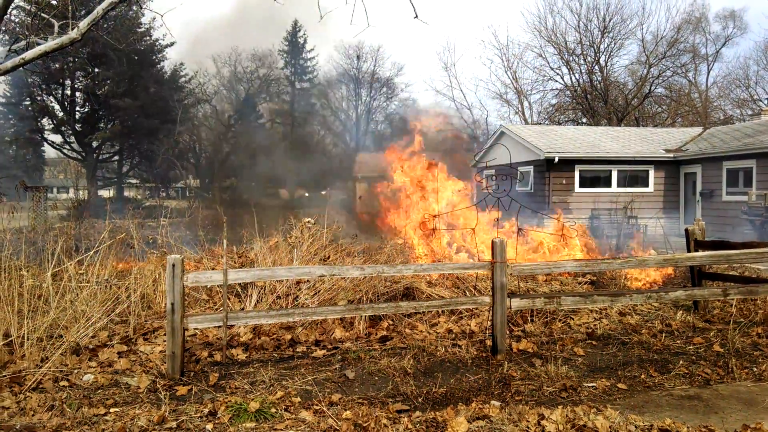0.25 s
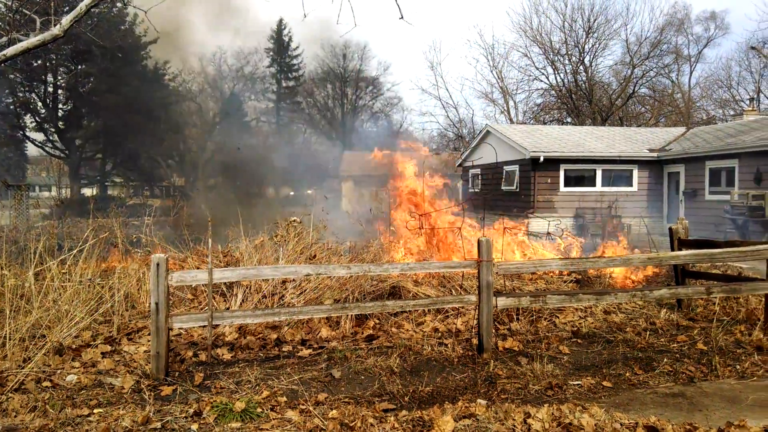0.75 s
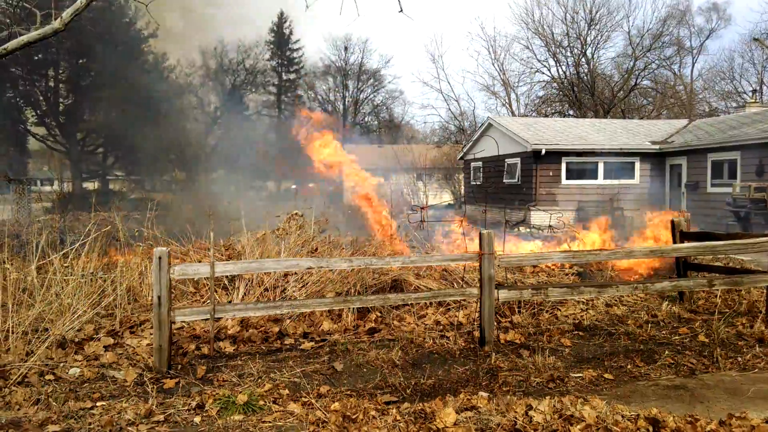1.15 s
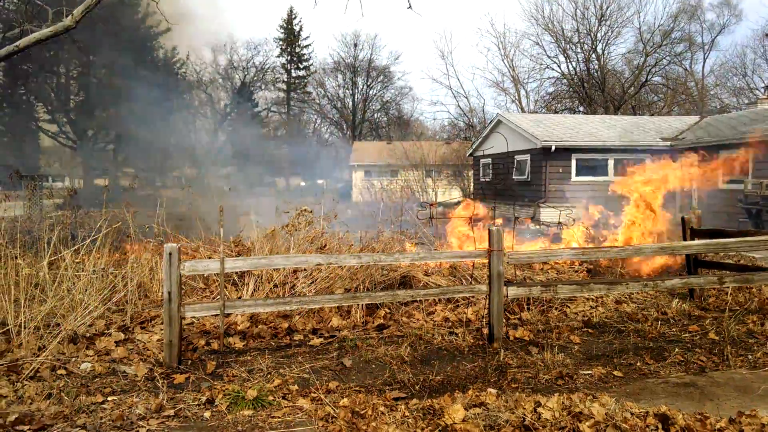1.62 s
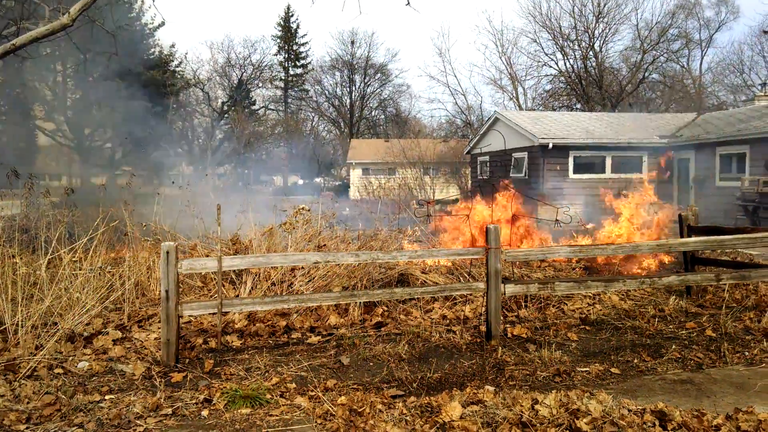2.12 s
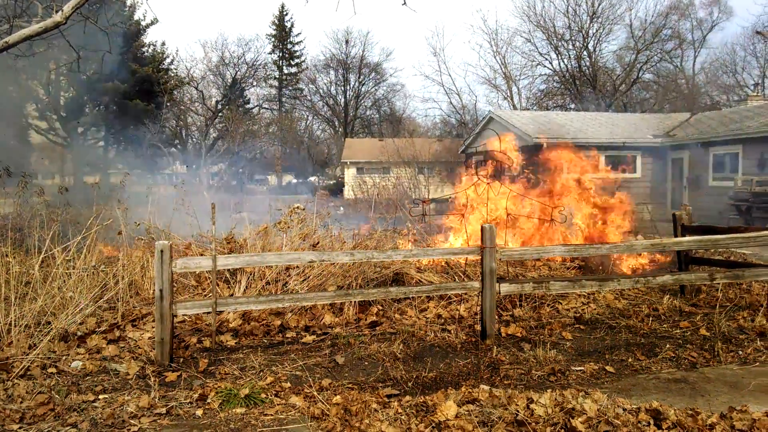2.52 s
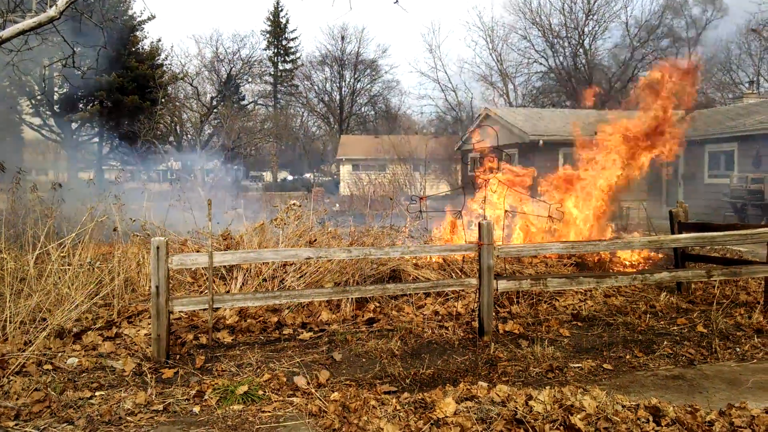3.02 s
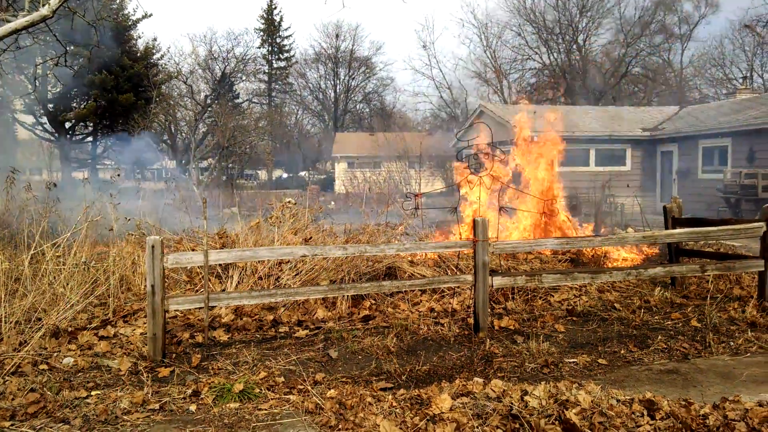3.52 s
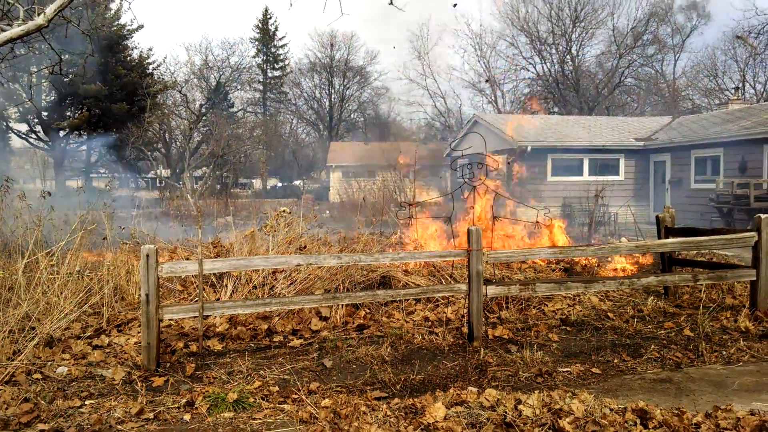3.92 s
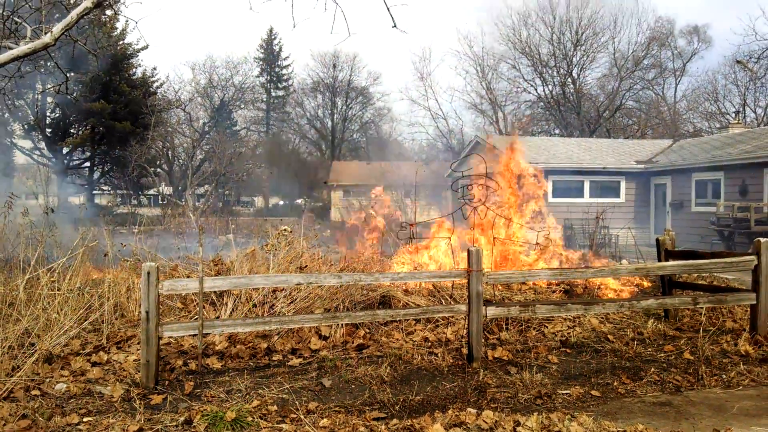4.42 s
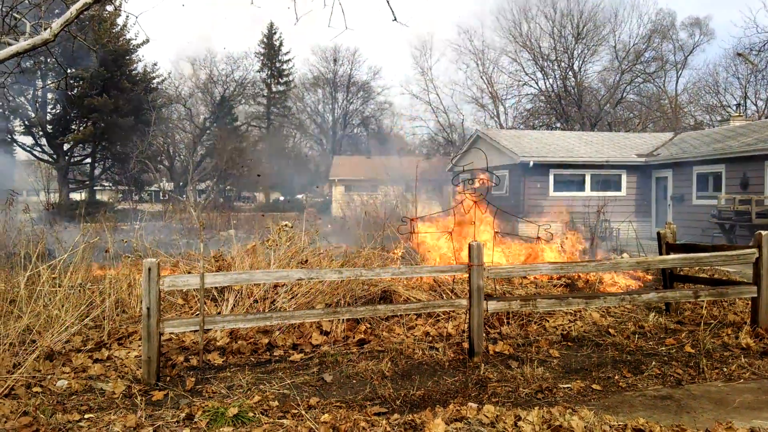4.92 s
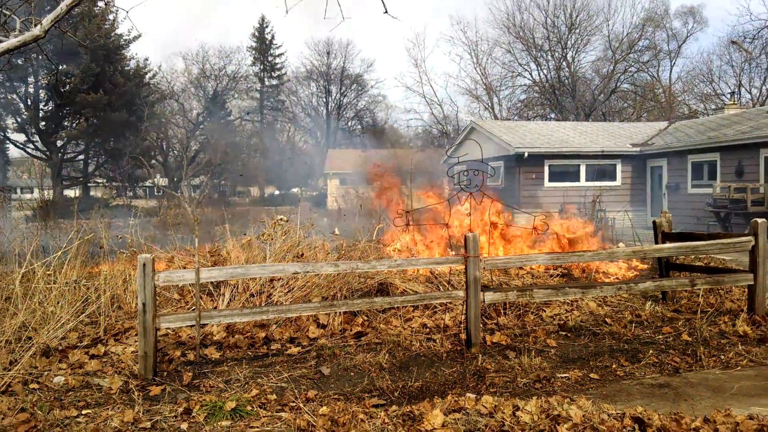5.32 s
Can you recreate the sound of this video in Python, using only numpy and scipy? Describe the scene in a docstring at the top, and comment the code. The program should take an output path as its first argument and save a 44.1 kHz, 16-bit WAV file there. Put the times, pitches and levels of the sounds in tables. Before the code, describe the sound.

A crackling grass fire snaps and hisses in an open yard, with heavy low wind buffeting over the stereo microphone.

```python
"""Dry grass and leaves burn in a yard, some metres from a stereo microphone.
Stalks burst in sharp pops, made of a hard crack, a ragged tear and a ringing hollow.
Countless small snaps crackle, steam sizzles as filtered noise, and the flames make a soft rush.
Gusts of wind buffet the two microphone ports: a low rumble of noise and rounded thumps."""
import sys
import numpy as np
from scipy import signal
from scipy.fft import rfft, irfft, next_fast_len
from scipy.io import wavfile
from scipy.ndimage import uniform_filter1d

SR = 44100
rng = np.random.default_rng(int(sys.argv[2]) if len(sys.argv) > 2 else 0)


def materialize(psi):
    """Save the field psi as 16-bit PCM at rate SR to the path in sys.argv[1].

    A 1-D psi becomes a single channel; in a 2-D psi each row is a channel.
    """
    bounded = np.clip(np.atleast_2d(psi).T, -1, 1)
    quanta = np.round(bounded * 32767).astype(np.int16)
    wavfile.write(sys.argv[1], SR, quanta)


N = 244903

# individually placed pops of bursting stalks, loud and faint, with a close rebound at 1.401 s;
# before common trims and stereo placing: start_s, level_db (2.6-7 kHz, averaged over 10 ms),
# body_db (against that level), hollow_pitch_hz, top_db (against that level),
# break_ms (nominal length of the break)
PLACED_POPS = [(0.038, -59, 10, 1300, 10, 0.85), (0.0688, -48, 8.5, 1410, -3.5, 1),
               (0.1064, -51, -2, 1200, 7, 1.1), (0.1246, -50, -3, 1500, 5, 0.9),
               (0.146, -48, 5.5, 1040, -2, 1.5), (0.25, -37.5, -7, 1630, -19, 0.82),
               (0.3303, -55, 12.5, 1010, -5, 1.3), (0.3495, -44.5, 6, 1100, 0, 0.9),
               (0.373, -46, 1, 1160, -14, 0.56), (0.4046, -35.5, -9, 1110, 3, 4.8),
               (0.4137, -29.5, 0, 770, 3, 0.45), (0.4778, -43, 3, 1110, -3, 1),
               (0.4941, -38.5, 0.5, 700, 3.5, 1.1), (0.581, -44.5, -2, 1400, -7, 0.98),
               (0.6051, -34.5, 4.5, 790, 3, 2.7), (0.7227, -35, -6.5, 1190, -2.5, 1.1),
               (0.7892, -55, -2, 1300, 12.5, 1.2), (0.814, -43.5, 0.5, 1100, 6, 0.81),
               (0.8628, -44.5, 0.5, 1300, 2.5, 0.53), (0.916, -38, -5, 650, -5, 1.2),
               (0.9951, -42, -11, 1500, -2, 1), (1.027, -38.5, -2.5, 1040, 7, 0.9),
               (1.128, -43, 1, 1000, 6, 1.1), (1.2263, -30, 0.5, 1310, 7.5, 1.3),
               (1.2886, -37.5, -3, 1200, -4, 1.5), (1.3291, -43, 2.5, 900, -11, 0.8),
               (1.3656, -28.5, -2, 945, -7, 0.92), (1.3689, -37, 1, 1100, 5, 1.1),
               (1.398, -23, -1.5, 910, 0, 0.36), (1.401, -27, -16, 900, -13, 0.33),
               (1.4193, -45, -4, 1200, 4, 1.6), (1.4451, -35, -7.5, 1640, -11, 2.1),
               (1.515, -49.5, 10, 1290, -2, 0.71), (1.5324, -38, -2, 790, 0, 1.7),
               (1.575, -33.5, 1.5, 1700, 2.5, 16), (1.6032, -31.5, 0.5, 1370, -4, 1.7),
               (1.678, -30.5, -5, 2070, 8, 1.6), (1.7209, -40, -7, 1200, 0, 1.2),
               (1.7287, -37.5, -4, 1400, 1, 1.1), (1.7683, -22.5, -4.5, 760, 5, 2.3),
               (2.0313, -40.5, -6, 1100, -2, 1), (2.041, -39, -2, 1210, -1, 1.6),
               (2.0725, -35.5, -9, 1300, 0, 1.1), (2.093, -25, -4, 890, -22, 1.1),
               (2.262, -19.5, -10, 794, -1.5, 2.5), (2.3282, -19, -15.5, 1530, -2.5, 0.65),
               (2.394, -51.5, 15.5, 1010, -1, 1.1), (2.5513, -36, -0.5, 1040, 0.5, 11.3),
               (2.6122, -51, -5, 1300, 4, 1.1), (2.6484, -38.5, -5, 1250, 1.5, 1.8),
               (2.669, -39.5, -21, 1400, -3, 1.7), (2.7486, -55, -8, 1200, 14.5, 1.2),
               (2.779, -46.5, -7, 1400, 7, 1.5), (2.818, -23, -4.5, 890, 1, 1.5),
               (2.842, -43, 8, 770, 5, 1.6), (2.945, -19.5, -2, 2170, -3.5, 1.13),
               (3.013, -42, 0.5, 960, 4, 5), (3.115, -49, -1, 750, 9.5, 4.4), (3.2, -43, 11, 870, 3, 1.5),
               (3.209, -41, 2, 1250, 3, 3.9), (3.2351, -35, -4.5, 1270, 1.5, 3.5),
               (3.3, -36, -2.5, 2010, 5.5, 0.8), (3.3755, -59, 9, 1100, 4, 0.91),
               (3.3898, -34, -8, 960, -1.5, 1.5), (3.4007, -49, -8, 1300, -1, 1.1),
               (3.4307, -29, 0, 1080, -4.5, 1.2), (3.4446, -39, -2, 1100, -5, 1.3),
               (3.472, -36.5, 0, 1030, 0.5, 4.6), (3.5545, -37, -3.5, 1020, 2.5, 5.3),
               (3.6103, -35.5, -1, 1200, 6.5, 5.4), (3.6428, -36, -4, 1310, 0, 6.7),
               (3.6733, -42, -1, 1300, 4, 0.49), (3.693, -33, -2, 1000, 0.5, 3.9),
               (3.7794, -36, 1, 1160, 2.5, 2.5), (3.8415, -34.5, -2, 675, -1.5, 3.6),
               (3.8575, -45, -9, 1300, 7, 0.98), (3.9544, -36, -1, 750, 2, 6),
               (3.9694, -30.5, -11, 750, -4.5, 3.5), (4.0796, -31, -3.5, 1330, 1, 1.5),
               (4.1435, -41.5, -9, 1400, 3.5, 2.1), (4.1526, -55, 5, 1200, -3, 0.92),
               (4.1773, -38, 1.5, 905, 3, 2.7), (4.243, -47, -4, 1400, 9, 0.7),
               (4.2708, -37.5, 0, 1210, -4, 1.2), (4.285, -42, -15, 1400, -3, 0.91),
               (4.319, -52, -7, 1300, 10, 1), (4.3365, -36, 5, 706, 0.5, 2.7),
               (4.351, -35, 1, 710, -0.5, 2.3), (4.4573, -42, 1.5, 640, -1, 1.7),
               (4.493, -41.5, 4, 1190, -15, 1.2), (4.593, -29.5, -0.5, 1160, 7.5, 0.68),
               (4.6395, -57, 9, 1400, 9, 1.1), (4.68, -38.5, -4, 960, 4, 1.4),
               (4.7063, -32, -12.5, 1640, 0.5, 1.9), (4.7718, -43.5, -2.5, 1150, 4.5, 2.4),
               (4.8418, -45, 11.5, 1170, -3, 0.38), (4.8538, -54, -5, 1200, 0, 1.1),
               (4.8832, -37, 3.5, 1210, -4, 1.7), (4.979, -39, 3, 746, -2, 3.2),
               (5.03, -45.5, 1.5, 1120, -8, 1), (5.07, -44, -20, 1520, 4, 1),
               (5.092, -35, -3.5, 1450, 2.5, 3.3), (5.1728, -27, -5, 1580, 6, 1.14),
               (5.1896, -27.5, -6.5, 1210, 1.5, 3), (5.2112, -29.5, -1.5, 1040, -13, 0.7),
               (5.2268, -41.5, -8, 1400, 6, 1), (5.2605, -40.5, -5.5, 1400, -1, 2.9),
               (5.3007, -46.5, -2, 1200, -3, 0.86), (5.354, -37, -15, 850, -5, 1.4),
               (5.3807, -46.5, -5, 1400, 6, 0.79), (5.392, -49, -3, 1400, 5, 0.7),
               (5.5292, -43, -6.5, 1000, 1, 0.83), (5.5364, -39, 7.5, 1310, 1, 2.4)]
# slow course of the burning, before trims and wavering: time_s, sizzle_db, flame_rush_db
BURN_COURSE = [(0, -55, -54.5), (0.25, -53.5, -51), (0.4, -51.5, -48), (0.75, -51, -47.5), (1.3, -43, -43),
               (1.52, -50, -44.5), (1.66, -43.5, -44.5), (1.86, -41, -47), (2.01, -45, -47),
               (2.3, -36.5, -44.5), (2.47, -47.5, -52), (2.75, -48.5, -48), (3.1, -54.5, -55),
               (3.35, -54.5, -55), (3.63, -45.5, -47.5), (4.35, -49, -48.5), (4.56, -52.5, -51),
               (5.5, -56.5, -54.5)]
# colour of the burning grass: pitch_hz, level_db
FIRE_COLOUR = [(250, -4.5), (600, 2), (1300, 2), (2100, 2), (2700, -1), (3200, -3.5), (4000, -2),
               (5100, -5), (6400, -2.5), (8000, -6.5), (10500, -2.5), (12200, -12), (13500, -14),
               (14800, -14), (16200, -21)]
# tone filter for the sizzle, rush and echo: dip near 2.6 kHz, lift at 3-9 kHz,
# falling above 11 kHz: pitch_hz, level_db
SIZZLE_AND_ECHO_COLOUR = [(2000, 0), (2600, -8.5), (3200, 2.5), (9000, 3), (11500, -3.5), (13400, -2),
                          (15000, -8)]

PORT_LAG_S = .00037  # delay between the two microphone ports


def undb(db):
    """Turn decibels into gain."""
    return 10 ** (np.asarray(db) / 20)


def unit(x):
    """Scale a sound to an rms (average strength) of 1."""
    return x / np.sqrt(np.mean(x ** 2) + 1e-18)


def curves(table):
    """Draw the columns of a time table as curves, one value a sample."""
    time_s, *columns = np.transpose(table)
    return [np.interp(np.arange(N) / SR, time_s, column) for column in columns]


def over_pitch(table, size):
    """Draw the columns of a frequency table as curves, one value a frequency bin."""
    hz, *columns = np.transpose(table)
    bins = np.log(np.fft.rfftfreq(size, 1 / SR) + 1)
    return [np.interp(bins, np.log(hz), column) for column in columns]


def colour(x, table):
    """Filter a sound to the given tone colour, with nothing sounding ahead of its cause."""
    length = x.shape[-1]
    size = 2 * next_fast_len((length + min(length, 8192)) // 2, True)
    # folding the cepstrum forward in time makes the filter minimum-phase
    cepstrum = irfft(np.log(undb(over_pitch(table, size)[0])))
    cepstrum[1:size // 2] *= 2
    cepstrum[size // 2 + 1:] = 0
    response = np.exp(rfft(cepstrum))
    return irfft(rfft(x, size) * response)[..., :length]


BAND_FILTERS = [signal.butter(3, edges_hz, "band", fs=SR, output="sos")
                for edges_hz in [(450, 2600), (2600, 7000), (7000, 12500), (12000, 17000)]]


def split(x):
    """Split a sound into body, middle, top and air, from low to high."""
    return [signal.sosfilt(band, x) for band in BAND_FILTERS]


def walk(rate):
    """Random levels held for 1 / rate seconds and smoothed twice, with rms 1."""
    hold = max(int(SR / rate), 2)
    steps = np.repeat(rng.standard_normal(N // hold + 1), hold)
    return unit(uniform_filter1d(uniform_filter1d(steps, hold), hold)[:N])


def bell(s, half_s):
    """A smooth swell that peaks at 1 at time s."""
    return np.exp(-((np.arange(N) / SR - s) / half_s) ** 2)


def ports(pair, pan_db):
    """Mix two unrelated versions into left and right: most alike near 2 kHz, left later above 1350 Hz."""
    # the two ports, unevenly alike above 3 kHz:
    # pitch_hz, likeness (0-1), left_minus_right_db (before pan_db is added)
    port_match = [(200, 0.71, -2), (950, 0.79, 2.5), (2220, 1, 6), (2800, 0.97, 1.5), (2980, 0.22, 4.5),
                  (3600, 0.78, 2), (5000, 0.95, 5), (6600, 0.06, 3.5), (9600, 0.13, -1.5),
                  (11100, 0.73, -1.5), (14500, 0.5, 6)]
    lag_from_hz = 1350
    size = next_fast_len(pair.shape[-1], True)
    likeness, balance_db = over_pitch(port_match, size)
    shares = np.sqrt([(1 + likeness) / 2, (1 - likeness) / 2])
    shared, apart = rfft(pair, size) * shares
    lagging_hz = np.maximum(np.fft.rfftfreq(size, 1 / SR) - lag_from_hz, 0)
    lag = np.exp(-2j * np.pi * PORT_LAG_S * lagging_hz)
    lean = undb((balance_db + pan_db) / 2)
    left = (shared + apart) * lag * lean
    right = (shared - apart) / lean
    return irfft(np.array([left, right]), size)[:, :pair.shape[-1]]


def sizzle_level(follow=0.49, typical_pop_db=-33, waver_db=1):
    """Sizzle in dB: steady burning plus a puff of steam after every placed pop, growing with its strength."""
    vent_db, rise_s, fall_s = -8.5, 0.0018, 0.03  # vent_db is against a typical pop
    kicks = np.zeros(N)
    for s, db, *_ in PLACED_POPS:
        puff_db = vent_db + typical_pop_db + follow * (db - typical_pop_db)
        kicks[min(int(s * SR), N - 1)] += undb(puff_db) ** 2
    t = np.arange(SR // 2) / SR
    puff = (1 - np.exp(-t / rise_s)) * np.exp(-t / fall_s)
    vent_power = signal.fftconvolve(kicks, (puff / puff.max()) ** 2)[:N]
    steady_db = curves(BURN_COURSE)[0] + waver_db * walk(24.74)
    return 10 * np.log10(undb(steady_db) ** 2 + vent_power)


def crackle(rate, spread_db, count=10):
    """Dense tiny snaps, most faint and a few strong; twigs ring low, blades higher, fine fibres highest."""
    ring_s, snap_q = .0006, 2.5
    out = 0
    for hz in np.geomspace(800, 13000, count):
        snaps = rng.random(N) < rate / SR  # rate is snaps a second in each register
        strength = np.minimum(rng.standard_exponential(N)[snaps], 3)
        energy = np.zeros(N)
        energy[snaps] = undb(spread_db * strength) ** 2
        fading = signal.lfilter([1], [1, -np.exp(-2 / (ring_s * SR))], energy + 1e-18)
        noise = np.sqrt(fading) * rng.standard_normal((2, N))
        out = out + signal.lfilter(*signal.iirpeak(hz, snap_q, fs=SR), noise)
    return unit(out)


def burning(sizzle_db, snap_db=-4, steam_db=-3, twig_db=-5, rush_db=-1, fibre_db=-4, flicker_db=2.5,
            brighten=0.15, top_db=1, flutter_db=0.3, roar_db=-43.5):
    """Snaps of twigs, blades and fibres over steam hiss and flame rush; a strong blaze is brighter."""
    # low roar of the flames: pitch_hz, level_db
    roar_colour = [(20, 1), (60, 1.5), (180, 3.5), (330, -5.5), (600, -8.5), (1000, -15), (2000, -24)]
    _, flame_db = curves(BURN_COURSE)
    snaps = colour(crackle(rate=130, spread_db=2.0), FIRE_COLOUR)
    flicker = undb(flicker_db * walk(160))
    gas = colour(rng.standard_normal((2, N)) * flicker, FIRE_COLOUR)
    # each register has its own mix of snaps and gas
    body = split(undb(twig_db) * snaps + undb(rush_db) * gas)[0]
    middle = split(undb(snap_db) * snaps + undb(steam_db) * gas)[1]
    top = sum(split(undb(fibre_db) * snaps + undb(steam_db) * gas)[2:])
    blaze_db = sizzle_db - np.mean(sizzle_db)
    top_gain = undb(top_db + brighten * blaze_db + flutter_db * walk(85))
    sizzle = (unit(middle) + top_gain * unit(top)) * undb(sizzle_db - 3.0)
    rush = unit(body) * undb(flame_db - 2.5)
    roar_level_db = roar_db + 1.17 * (flame_db - np.mean(flame_db)) + 0.7 * walk(11.0)
    roar = unit(colour(rng.standard_normal((2, N)), roar_colour)) * undb(roar_level_db)
    return ports(colour(sizzle + rush, SIZZLE_AND_ECHO_COLOUR) + roar, pan_db=-4.5)


def ticks(sizzle_db, count=250, size=256, tick_db=-50.5, follow=0.67):
    """Single blades snap near by: each tick is a burst of noise fading in under a millisecond, at its own pitch."""
    blaze_db = follow * (sizzle_db - np.mean(sizzle_db))
    t = np.arange(size) / SR
    out = np.zeros((2, N + size))
    for when, pitch, length, strength in rng.random((count, 4)):
        start = int(when * N)
        hz = 2400 * 6 ** pitch
        ring_s = .00006 + .0003 * length
        extra_db = -4.5 * np.log(.04 + strength)  # a few ticks stand out
        noise = np.exp(-t / ring_s) * rng.standard_normal((2, size))
        tick = signal.lfilter(*signal.iirpeak(hz, 1.8, fs=SR), noise)
        out[:, start:start + size] += unit(tick) * undb(tick_db + blaze_db[start] + extra_db)
    return ports(colour(out[:, :N], FIRE_COLOUR), pan_db=-6.5)


def turbulence(table, steady_s):
    """Low noise whose slow swells are evened out, so that the gusts alone set its strength."""
    x = colour(rng.standard_normal(N), table)
    return x / np.sqrt(uniform_filter1d(x ** 2, int(steady_s * SR)) + 1e-18)


def wind(swell_db=1.5, eddy_db=-1, own_swell_db=-13, own_eddy_db=-11, lean_db=.5):
    """Gusts push the ports in opposite senses, the right later and weaker; each has some turbulence of its own."""
    # breeze at the microphone, before flutter and trims: time_s, pressure_db
    breeze_course = [(0, -33), (0.28, -32), (0.6, -23), (1.0, -33), (1.28, -35.5), (1.7, -32.5),
                     (2.03, -49), (2.2, -42), (2.6, -36.5), (3.0, -29.5), (3.35, -33.5), (3.85, -25.5),
                     (4.02, -28), (4.3, -19.5), (4.42, -23), (4.63, -31.5), (4.9, -26), (5.15, -33.5),
                     (5.55, -30.5)]
    # gusts on top of the breeze, before trims:
    # peak_s, pressure_db, half_length_s, small_eddies_db (against the pressure)
    gust_list = [(0.122, -28.5, 0.036, -8), (0.366, -23.5, 0.019, -6.5), (0.506, -19.5, 0.054, -7),
                 (0.838, -18, 0.024, -7), (0.95, -20, 0.044, -7), (1.085, -15, 0.041, -15),
                 (1.39, -24, 0.021, -28), (1.547, -31, 0.067, -16), (1.67, -29, 0.01, -26),
                 (2.916, -17.5, 0.013, -7), (3.444, -19, 0.035, -4), (3.75, -21, 0.014, -14),
                 (3.874, -19.5, 0.12, -14), (4.212, -20.5, 0.04, -19), (4.392, -16.5, 0.039, -13),
                 (4.48, -27, 0.059, -25), (4.875, -17.5, 0.037, -9.5), (4.983, -16.5, 0.042, -9),
                 (5.291, -23.5, 0.016, -12)]
    # large eddies on the ports: pitch_hz, level_db
    swell_colour = [(8, -39), (22, -9.5), (45, 2.5), (110, -2), (170, -7), (260, -20.5), (500, -50.5),
                    (1000, -81)]
    # small eddies on the ports: pitch_hz, level_db
    eddy_colour = [(60, -12), (130, -10.5), (220, 4.5), (320, -5), (480, -18), (700, -21), (1200, -50.5),
                   (3000, -61)]
    breeze_eddy_db, breeze_flutter_db = -12, 3  # small eddies against the pressure; unsteadiness
    breeze = undb(curves(breeze_course)[0] + breeze_flutter_db * walk(15))
    flows = [(breeze, breeze_eddy_db)]
    for s, db, half_s, small_db in gust_list:
        flows.append((undb(db) * bell(s, half_s), small_db))
    # separate flows add up as powers
    swell = undb(swell_db) * np.sqrt(sum(flow ** 2 for flow, _ in flows))
    eddy = undb(eddy_db) * np.sqrt(sum((flow * undb(small_db)) ** 2 for flow, small_db in flows))
    push = swell * turbulence(swell_colour, 0.05) + eddy * turbulence(eddy_colour, 0.0317) + buffets()
    own = []
    for _ in range(2):
        own_swell = swell * undb(own_swell_db) * turbulence(swell_colour, 0.038)
        own_eddy = eddy * undb(own_eddy_db) * turbulence(eddy_colour, 0.06)
        own.append(own_swell + own_eddy)
    left = push * undb(lean_db)
    right = -np.roll(push, round(PORT_LAG_S * SR)) / undb(lean_db)
    return np.array([left, right]) + np.array(own)


def small_pops(count=36, over_sizzle_db=-5.5, spread_db=1.5, follow=1.0, body_db=-2, body_spread_db=3,
               stalk_hz=1150, top_db=2, top_spread_db=7.5, break_ms=1.0):
    """Thin stalks burst at random moments, louder where the fire is strong; rows as in PLACED_POPS."""
    sizzle_db, _ = curves(BURN_COURSE)
    mean_db = np.mean(sizzle_db)
    base_db = mean_db + follow * (sizzle_db - mean_db) + over_sizzle_db
    # one random moment in each equal slice of time
    starts = ((np.arange(count) + rng.random(count)) / count * (N - 1)).astype(int)
    chances = np.clip(rng.standard_normal((count, 5)), -2, 2)
    return [(i / SR, base_db[i] + spread_db * a, body_db + body_spread_db * b,
             stalk_hz * 2 ** (c / 2), top_db + top_spread_db * d, break_ms * 2 ** (e / 2))
            for i, (a, b, c, d, e) in zip(starts, chances)]


def pops(rows, rustle_s=0.0099, rustle_db=-26.0, break_share=1.64, settle_db=-24, settle_s=0.0034,
         ragged_db=5, crack_db=9, knock_db=17.0, body_db=-1, middle_db=0.0, top_db=0,
         air_db=-12.0, air_follow=1.3):
    """Each stalk cracks, which knocks its hollow, tears raggedly, stops short and shakes the grass round it."""
    stalk_q, stalk_db = 1.7, -7  # ring of the hollow; its level from the tear
    splinter_range_hz, splinter_q, splinter_db = (3300, 12000), 8, 3
    ground_s, ground_db = 0.0034, -16  # typical delay and level of one bounce off the ground
    pan_db, pan_spread_db = -5.5, 0.1  # left minus right
    size = 2048
    t = np.arange(size) / SR
    out = np.zeros((2, N + size))
    crack = np.zeros((2, size))
    crack[0, 12] = 1
    for s, db, body, hz, top, break_ms in rows:
        tear_ms = break_share * max(break_ms, .2)
        age = t * 1e3 / tear_ms
        tearing = age ** 0.57 * np.exp(-age ** 2)
        settling = undb(settle_db) * np.exp(-t / settle_s)
        fibres = undb(ragged_db * np.repeat(rng.standard_normal(size // 8), 8))
        ragged = (tearing + settling) * fibres * rng.standard_normal((2, size))
        tear = colour(undb(crack_db) * crack + ragged, FIRE_COLOUR)
        knock = undb(stalk_db) * tear + undb(knock_db) * crack
        hollow = signal.lfilter(*signal.iirpeak(hz, stalk_q, fs=SR), knock)
        # every splinter rings briefly at a pitch of its own
        splinter_hz = np.exp(rng.uniform(*np.log(splinter_range_hz), size=3))
        rings = [signal.lfilter(*signal.iirpeak(f, splinter_q, fs=SR), tear) for f in splinter_hz]
        splinter = undb(splinter_db) * sum(rings)
        # a longer tear shakes more of the grass
        shaking = undb(rustle_db) * np.sqrt(tear_ms) * np.exp(-t / rustle_s)
        rustle = colour(shaking * rng.standard_normal((2, size)), FIRE_COLOUR)
        delay = int(ground_s * SR * rng.uniform(0.64, 1.3))
        bounce = undb(ground_db) * np.roll(tear + hollow, delay)
        band_db = np.array([body + body_db, middle_db, top + top_db, air_follow * top + air_db])
        bands = split(tear + hollow + splinter + bounce + rustle)
        burst = sum(gain * unit(band) for gain, band in zip(undb(db + band_db), bands))
        burst = burst * np.sqrt(.01 * SR / size)  # levels count over 10 ms
        start = int(s * SR)
        out[:, start:start + size] += ports(burst, pan_db + pan_spread_db * rng.standard_normal())
    return out[:, :N]


def yard(x, t60_s=0.096, echo_db=-17, build_s=0.033):
    """Fence, house wall and trees scatter a thin, short tail of decaying noise echoes."""
    t = np.arange(SR // 2) / SR
    fade = np.exp(-np.log(1000) * t / t60_s) * (1 - np.exp(-t / build_s))
    tail = rng.standard_normal((2, len(t))) * fade
    tail /= np.sqrt(np.sum(tail ** 2, axis=1, keepdims=True))
    return undb(echo_db) * signal.fftconvolve(x, tail, axes=1)[:, :N]


def buffets(size=4096):
    """Each hard eddy's core is one rounded pressure thump, brighter when brief, with ragged turbulence round it."""
    # single hard eddies that slap the ports, before the left-right lean:
    # peak_s, thump_db, core_half_width_ms, turbulence_db, turbulence_half_length_ms
    slaps = [(0.351, -8.5, 2.6, -32, 6), (0.492, -6, 3.5, -25.5, 8), (0.531, -14, 1.8, -29, 4.2),
             (0.643, -6, 3, -27, 6), (0.843, -8, 2.4, -26, 6.7), (1.076, -10, 2.8, -38, 7),
             (1.099, -15, 2.2, -34, 6), (2.918, -15, 1.8, -26.5, 6), (3.423, -7.5, 1.8, -26.5, 3.6),
             (3.76, -13, 2.1, -24.5, 10.5), (3.845, -16, 4.3, -25.5, 11), (3.883, -5, 4.8, -33, 6),
             (3.926, -2.5, 1.13, -13.5, 6.5), (4.106, -4.5, 3.6, -30, 6), (4.16, -10, 4.1, -27, 16),
             (4.185, -8, 1.5, -16.5, 5.1), (4.233, -3, 1.15, -13, 8.4), (4.244, 0, 3, -34, 4),
             (4.279, -12, 5, -46, 5), (4.316, -9, 1.04, -23, 6.4), (4.345, -10, 2.6, -11, 6.4),
             (4.366, -2, 5.3, -34, 5.4), (4.377, -4.5, 1.1, -16, 6.1), (4.4, -7, 1.8, -19.5, 10),
             (4.461, -11, 2.6, -25, 3.7), (4.889, -12, 1.6, -22.5, 2.5), (4.995, -3.5, 1.4, -19.5, 9)]
    # colour of the turbulence in such a slap: pitch_hz, level_db
    slap_colour = [(50, 3), (130, 15.5), (260, 20.5), (400, 14.5), (560, 5.5), (760, -7.5), (1000, -22.5),
                   (2000, -31)]
    out = np.zeros(N + size)
    ms = (np.arange(size) - size // 2) / SR * 10 ** 3
    for s, thump_db, core_ms, ragged_db, half_ms in slaps:
        reach = (ms / core_ms) ** 2
        thump = (1 - reach) * np.exp(-reach / 2)
        shape = np.exp(-(ms / half_ms) ** 2)
        noise = colour(rng.standard_normal(size), slap_colour)
        ragged = unit(shape * noise) * np.sqrt(np.mean(shape ** 2))
        start = int(s * SR) - size // 2
        out[start:start + size] += undb(thump_db) * thump + undb(ragged_db) * ragged
    return out[:N]


def jets(flutter_db=-0.5):
    """Steam spurts from damp stems in short, bright, fluttering hisses of filtered noise."""
    # jets of steam, before flutter and stereo placing:
    # peak_s, level_db, half_length_s, whistle_db (thin whistling top against the level)
    spurts = [(0.918, -46, 0.0074, 9), (1.02, -52, .012, -2), (1.931, -29.5, 0.038, -5),
              (2.163, -31.5, 0.0082, -12), (2.189, -34, 0.017, -5), (5.2, -36, 0.03, -20),
              (5.373, -39, 0.018, -23)]
    # colour of such a jet: pitch_hz, level_db
    steam_colour = [(1500, -9), (3000, -1), (4200, -8), (5200, -1), (6600, 4.5), (9500, 2.5), (11500, -13),
                    (13500, -20)]
    # colour of its whistling top: pitch_hz, level_db
    whistle_colour = [(7000, -9), (11500, 6), (12500, 1), (13600, 1), (14900, 5), (16000, -6)]
    hiss = sum(undb(db) * bell(s, half_s) for s, db, half_s, _ in spurts)
    whistle = sum(undb(db + thin_db) * bell(s, half_s) for s, db, half_s, thin_db in spurts)
    steam = 0
    for flow, table in [(hiss, steam_colour), (whistle, whistle_colour)]:
        steam = steam + flow * unit(colour(rng.standard_normal((2, N)), table))
    return ports(steam * undb(flutter_db * walk(150)), pan_db=-2.5)


def scene():
    """Fire, the echo of its pops, and wind on the microphone."""
    bursts = pops(PLACED_POPS + small_pops())
    echo = colour(yard(bursts), SIZZLE_AND_ECHO_COLOUR)
    sizzle_db = sizzle_level()
    fire = burning(sizzle_db) + ticks(sizzle_db) + bursts + echo + jets()
    return fire + wind()


def record(dry):
    """The recorder rounds off the highest peaks and cuts the top."""
    ceiling, top_hz = .9, 15900  # ceiling: full scale is 1
    rounded = dry / (1 + (dry / ceiling) ** 6) ** (1 / 6)
    return signal.sosfilt(signal.ellip(8, .2, 70, top_hz, fs=SR, output="sos"), rounded)


dry = scene()
out = record(dry)
materialize(out)
```